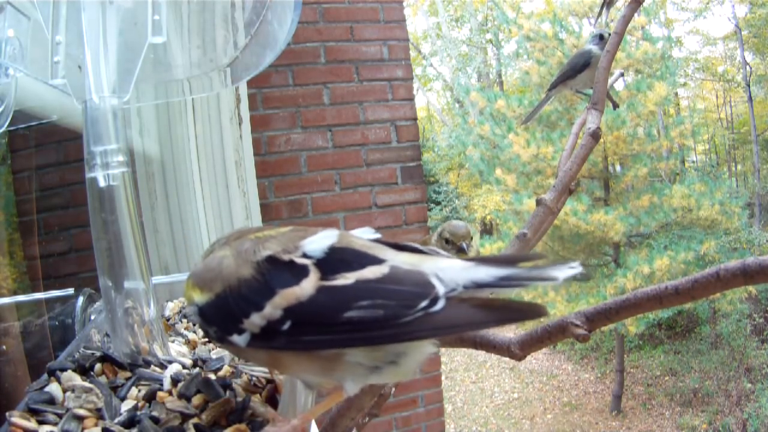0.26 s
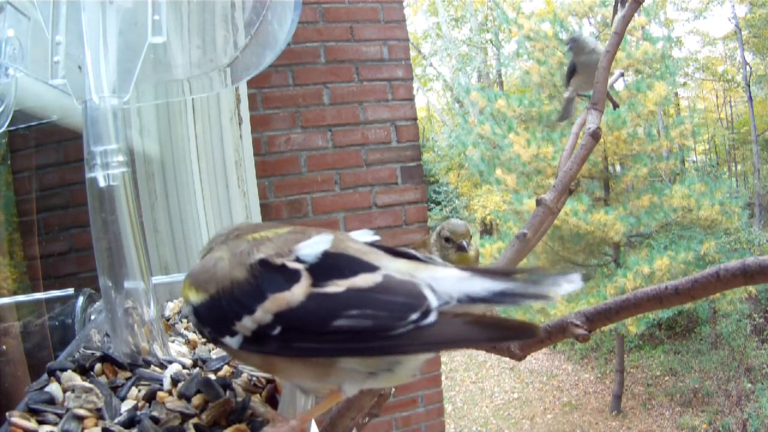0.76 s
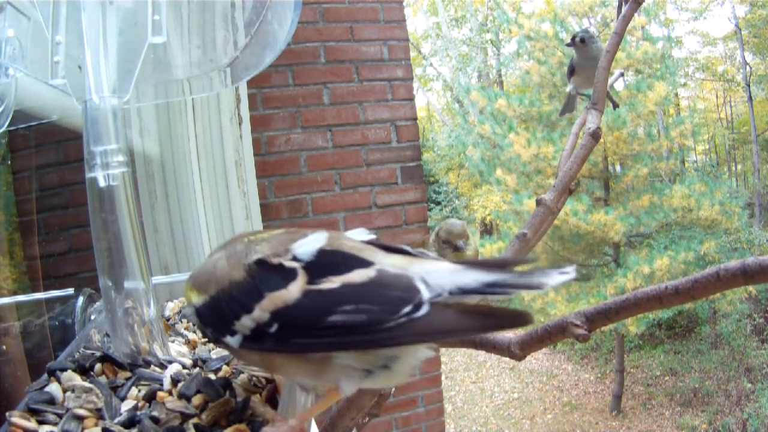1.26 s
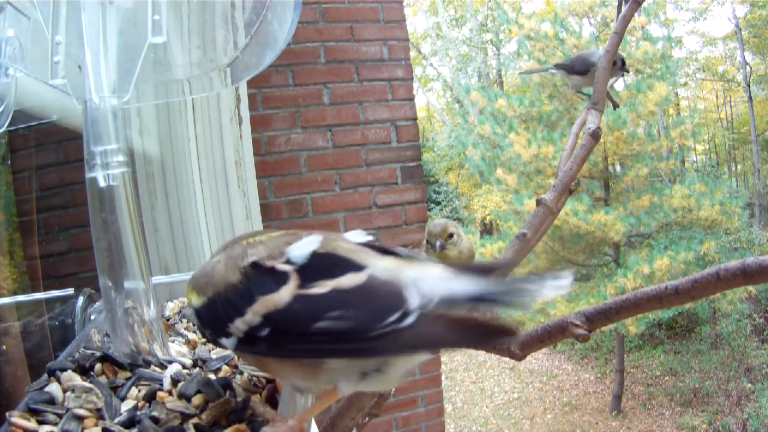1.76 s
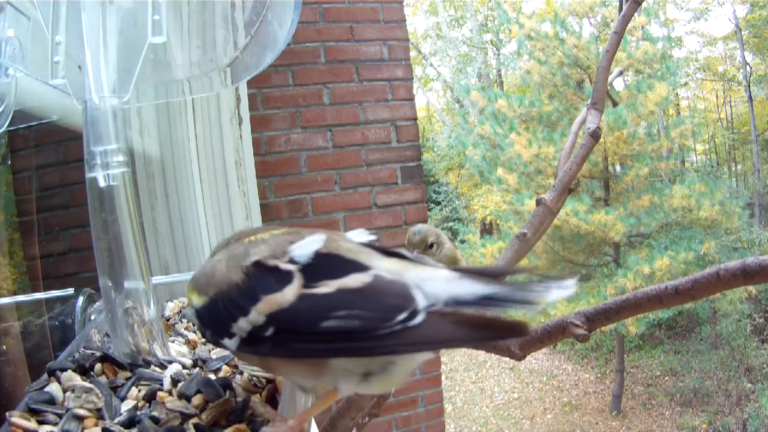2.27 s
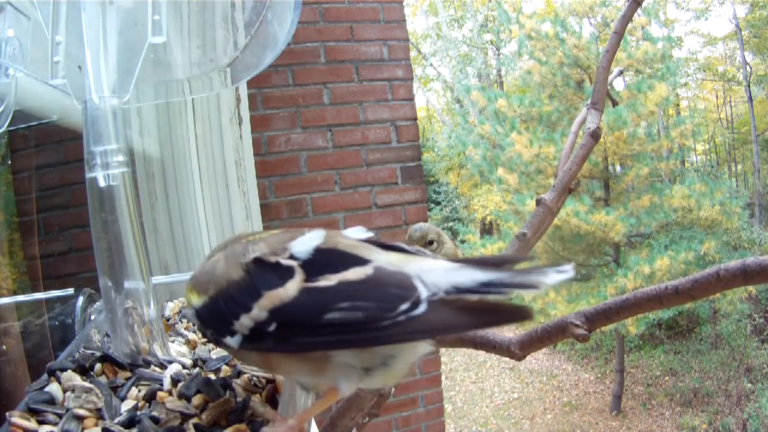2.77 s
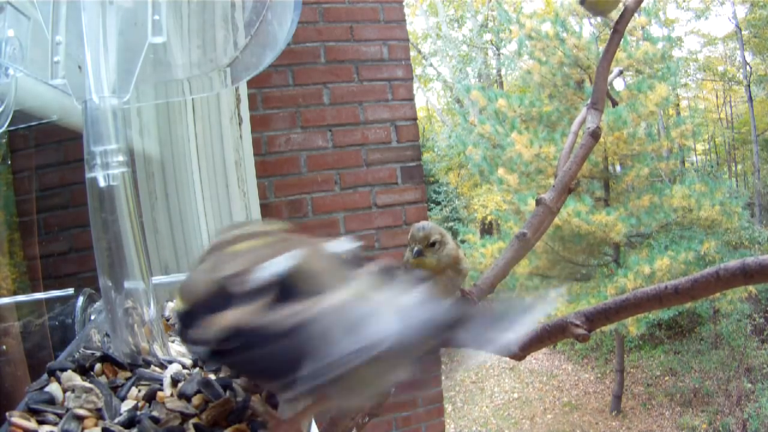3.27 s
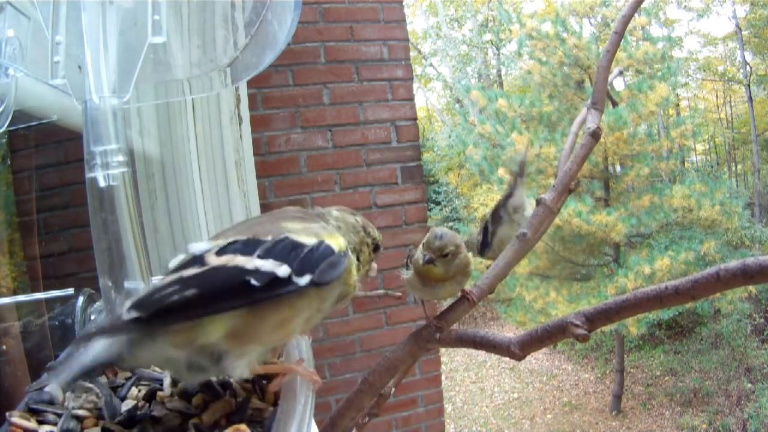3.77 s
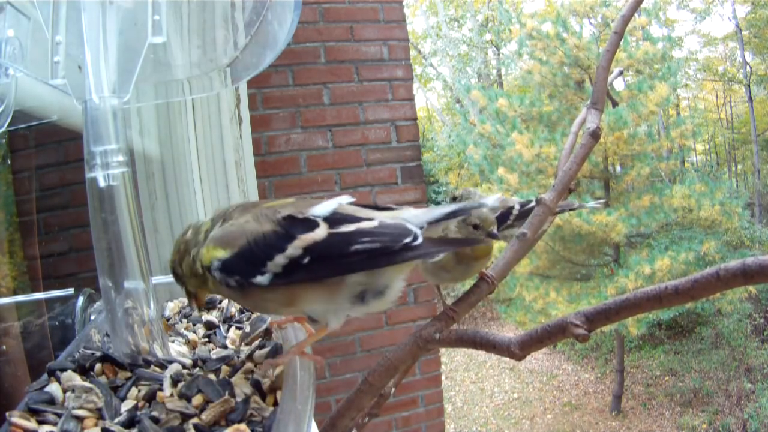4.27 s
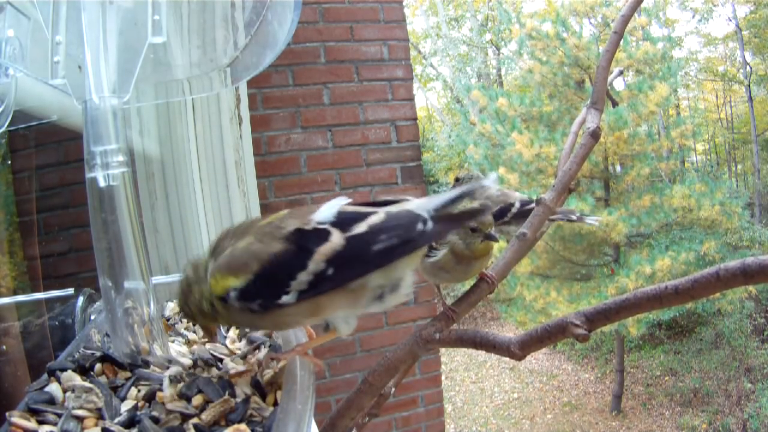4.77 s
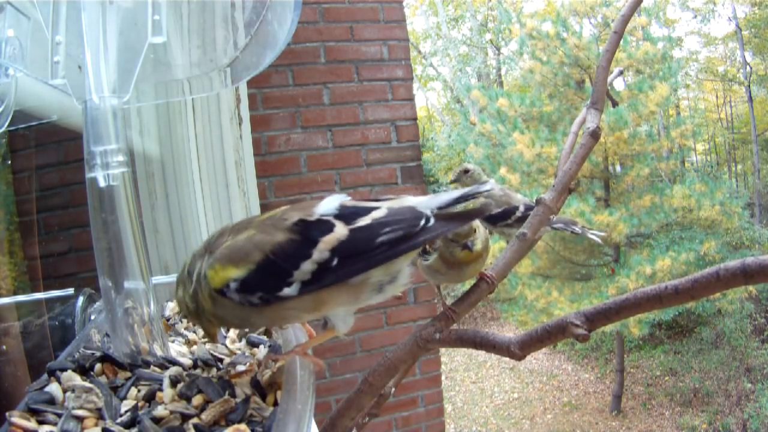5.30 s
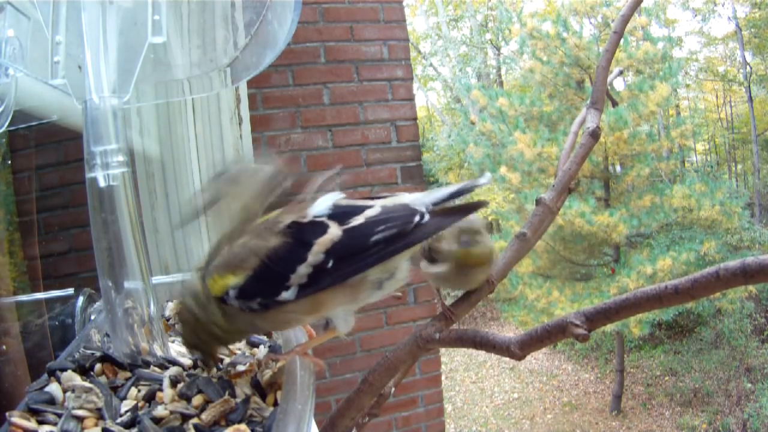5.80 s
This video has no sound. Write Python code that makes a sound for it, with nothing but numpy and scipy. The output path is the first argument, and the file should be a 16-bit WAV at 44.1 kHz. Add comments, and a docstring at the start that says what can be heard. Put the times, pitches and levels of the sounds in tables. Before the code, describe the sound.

Beside a plastic window feeder, a microphone hears constant low outdoor hiss. A quiet tick, then short thin chirps and a low wing whirr as a bird passes. Midway a flurry of seed ticks, foot shuffles and two loud, dry knocks on the tray, with another chirp. Afterwards only sparse ticks and light taps, ending with a close wing gust.

```python
"""Steady outdoor hiss, then beaks ticking on seeds: finches feed in a plastic window feeder beside a small camera.
Ticks and foot shuffles are decaying tuned noise; the few short chirps are sliding sines.
Wings push gust pulses at the microphone and leave a low noise whirr; knocks on the tray, two of them loud,
are pulses with ringing modes and a rattle. The camera samples slowly, mirroring each sound into the treble."""
import sys
import numpy as np
from scipy import signal
from scipy.fft import rfft, irfft
from scipy.io import wavfile
from scipy.ndimage import uniform_filter1d

SR = 44100
rng = np.random.default_rng(int(sys.argv[2]) if len(sys.argv) > 2 else 0)


def inscribe(sig):
    """Save sig as 16-bit PCM at rate SR to the path in sys.argv[1].

    A 1-D sig is mono; a 2-D sig holds one channel per row.
    Samples are clipped to [-1, 1] before scaling.
    """
    pcm = np.round(np.clip(np.atleast_2d(sig).T, -1, 1) * 32767)
    wavfile.write(sys.argv[1], SR, pcm.astype(np.int16))


N = 266496
TIME, FREQS = np.arange(N) / SR, np.fft.rfftfreq(N, 1 / SR)


def amp(db):
    """Decibels to gain."""
    return 10 ** (np.asarray(db) / 20)


def unit(x):
    """Scales to rms 1."""
    return x / np.sqrt(np.mean(x ** 2) + 1e-20)


def add(mix, start_s, sound):
    """Mixes a sound in at start_s, in place."""
    part = mix[max(round(start_s * SR), 0):][:len(sound)]
    part += sound[:len(part)]


def colour(x, points):
    """Filters by (f/Hz, gain/dB) points, interpolated over log frequency."""
    hz, db = np.transpose(points)
    gain_db = np.interp(np.log(FREQS + 1), np.log(hz + 1), db)
    return irfft(rfft(x) * amp(gain_db), N)


def noise(spectrum):
    """Steady noise of one colour, rms 1."""
    return unit(colour(rng.standard_normal(N), spectrum))


def butter2(x, cutoff_hz, kind="low"):
    """Second-order Butterworth filter."""
    return signal.sosfilt(signal.butter(2, cutoff_hz, kind, fs=SR, output="sos"), x)


# Outdoor rumble and microphone hiss, relative density: (f/Hz, level/dB)
HISS_SPECTRUM = [(15, -19), (35, -6.5), (68, 1), (100, -2.5), (135, -2), (250, -5), (340, -8.5),
                 (500, -11.5), (1000, -14), (1450, -19), (2500, -18.5), (3500, -20), (5000, -21.5)]
HISS_DB = -47
# Tree rustle as a breeze gets up, before BREEZE_GAIN_DB: (t/s, level/dB)
BREEZE_LEVEL = [(0, -60), (1.5, -49), (2.3, -48.5), (3.4, -44.5), (5.2, -46.5), (6.04, -46.5)]
# Tree rustle, relative density: (f/Hz, level/dB)
BREEZE_SPECTRUM = [(100, -32), (400, 5.5), (700, 2.5), (1100, -2), (1700, -8), (5000, -11)]
BREEZE_GAIN_DB = -7


def outdoor_air():
    """Constant coloured noise, plus leaf-rustle noise whose level follows the breeze."""
    hiss = amp(HISS_DB) * noise(HISS_SPECTRUM)
    breeze_db = BREEZE_GAIN_DB + np.interp(TIME, *np.transpose(BREEZE_LEVEL))
    return hiss + amp(breeze_db) * noise(BREEZE_SPECTRUM)


# Beaks and claws on seed husks: (t/s, level/dB, centre f/Hz, ring t60/s)
TICKS = [(0.0166, -39, 4380, 0.014), (2.369, -36.5, 3950, 0.0069), (3.3816, -34, 5200, .006),
         (3.3907, -29.5, 6200, .008), (3.394, -35, 6240, 0.0082), (3.416, -41, 3250, .02),
         (3.4334, -31, 4200, .0041), (3.6692, -32.5, 2600, 0.01), (3.6825, -44, 2700, 0.025),
         (3.6875, -37, 2700, 0.018), (3.7, -43, 4000, 0.0046), (3.7058, -36, 2600, 0.015),
         (3.809, -41, 3170, .008), (3.8228, -31, 3300, 0.0039), (3.844, -45, 3800, .011),
         (4.185, -44.5, 4800, .012), (4.701, -39, 4730, .016), (4.732, -32.5, 5900, 0.0069),
         (5.0003, -31.5, 3200, 0.012), (5.796, -40, 5900, .01), (5.81, -44, 4200, .013)]


def seeds(half_width_hz=1250, scatter_db=-19, scatter_t60_s=0.075):
    """A husk snaps in a brief, broadly tuned burst, and the seeds around it shift."""
    out, t = np.zeros(N), TIME[:SR // 12]
    f = np.fft.rfftfreq(len(t), 1 / SR)
    for start_s, db, centre_hz, t60_s in TICKS + shuffles():
        resonance = 1 / (1 + 1j * (f ** 2 - centre_hz ** 2) / (2 * half_width_hz * f + 1))
        grit = unit(irfft(rfft(rng.standard_normal(len(t))) * resonance, len(t)))
        snap = amp(-60 * t / t60_s)
        scatter = amp(scatter_db - 60 * t / scatter_t60_s)
        fall = snap + scatter
        add(out, start_s, amp(db) * unit(grit * fall) * np.sqrt(np.mean(fall ** 2)))
    return out


# Whistled notes; the overlapping two are the two sides of one syrinx:
# (t/s, length/s, first f/Hz, last f/Hz, bend: 1 = straight, more = late fall,
#  peak level/dB, peak place/0-1, swell/dB)
CHIRPS = [(1.749, .021, 2880, 2630, 1.2, -47, 0.58, 9), (2.4775, 0.028, 3350, 2820, 0.97, -36, 0.46, 4),
          (2.627, .049, 4230, 3060, 1.65, -35, 0.62, 13), (2.632, 0.043, 3160, 2210, 0.72, -40, 0.64, 11),
          (3.9725, 0.043, 3160, 2780, 3.3, -38.5, 0.5, 9)]
SWELL_WIDTH = 0.26  # share of a note


def chirp(start_s, length_s, first_hz, last_hz, bend, db, peak, swell_db, waver=0.0039, flutter_db=1.8):
    """A nearly pure whistle swells once as it slides down; pitch and strength tremble a little."""
    t = np.arange(0, length_s, 1 / SR)
    u = t / length_s
    # Noise smoothed over 90 samples
    tremble, flutter = (unit(uniform_filter1d(rng.standard_normal(N), size=90))[:len(t)] for _ in range(2))
    slide_hz = first_hz + (last_hz - first_hz) * u ** bend
    turns = np.cumsum(slide_hz * (1 + waver * tremble)) / SR
    swell = np.exp(-((u - peak) / SWELL_WIDTH) ** 2) - 1
    level = amp(db + swell_db * swell + flutter_db * flutter)
    level = level * signal.windows.tukey(len(t), 0.05)
    return start_s, np.sqrt(2) * level * np.sin(2 * np.pi * turns)


def chirps():
    """Places every whistled note."""
    out = np.zeros(N)
    for row in CHIRPS:
        add(out, *chirp(*row))
    return out


# Birds flying close to the microphone:
# (t/s, close pass/s, peak gust level/dB, eddy share, whirr level at t/dB, whirr length/s)
FLIGHTS = [(2.21, 0.155, -34, .27, -47.5, .68), (5.636, .02, -34, 0.24, -58.5, .2),
           (5.757, .02, -41, 0.28, -58.5, .1), (6.023, .02, -20, 0.18, -38.5, .1)]
# Wing whirr, relative density: (f/Hz, level/dB)
WHIRR_SPECTRUM = [(20, -5), (95, -33), (117, 4.5), (138, 0), (160, 1), (200, -16), (240, -7), (310, -20),
                  (1000, -19), (5000, -39)]
WINGBEAT_S, UPSTROKE_S = 0.0535, 0.0376  # beat period; downstroke-to-upstroke delay
GUST_HALF_S, PASS_FADE_DB = 0.0048, -5.5  # gust half length; loss at either end of a pass
WHIRR_ATTACK_S, WHIRR_SAG_DB_PER_S, WHIRR_RELEASE_S = 0.031, -7.5, 0.43


def wings(eddy_cutoff_hz=160):
    """Each stroke pushes air at the microphone, then draws it back, shedding eddies; a low whirr lingers."""
    eddies = unit(butter2(rng.standard_normal(N), eddy_cutoff_hz))
    whirr, out = noise(WHIRR_SPECTRUM), np.zeros(N)
    for start_s, pass_s, gust_db, eddy_share, whirr_db, whirr_s in FLIGHTS:
        t = TIME - start_s
        attack = np.clip(1 + t / WHIRR_ATTACK_S, 0, 1)  # full at start_s
        release = np.clip(1 - (t - whirr_s) / WHIRR_RELEASE_S, 0, 1)
        sagging_db = whirr_db + WHIRR_SAG_DB_PER_S * np.maximum(t, 0)
        out += whirr * attack * release * amp(sagging_db)
        downstrokes = np.arange(0, pass_s, WINGBEAT_S)
        upstrokes = np.arange(UPSTROKE_S, pass_s, WINGBEAT_S)
        for stroke_s in np.r_[downstrokes, upstrokes]:
            u = (t - stroke_s) / GUST_HALF_S
            db = gust_db + PASS_FADE_DB * (2 * stroke_s / pass_s - 1) ** 2
            out += amp(db) * (eddy_share * eddies - u) * np.exp((1 - u ** 2) / 2)
    return out


# Feet shuffling in the seeds: (t/s, length/s, mean level/dB, centre f/Hz)
SHUFFLES = [(2.373, .022, -44, 4400), (3.354, .01, -46, 3500), (3.397, .06, -47, 3800),
            (3.541, .01, -44, 3500), (3.658, .05, -46, 2800), (3.731, .02, -50, 3600),
            (4.738, .02, -49, 4400), (6.012, .025, -47, 3400)]
SHUFFLE_GAP_S, SHUFFLE_SPREAD_DB, SHUFFLE_T60_S = 0.011, 3.5, 0.017


def shuffles():
    """Shuffling feet make runs of ticks for seeds(): one per gap, at a chance moment and strength."""
    ticks = []
    for start_s, length_s, db, centre_hz in SHUFFLES:
        slots_s = np.arange(start_s, start_s + length_s, SHUFFLE_GAP_S)
        for slot_s, (late, force) in zip(slots_s, rng.random(size=(40, 2))):
            tick_db = db + SHUFFLE_SPREAD_DB * (2 * force - 1)
            ticks.append((slot_s + SHUFFLE_GAP_S * late, tick_db, centre_hz, SHUFFLE_T60_S))
    return ticks


# Blows on the tray: (t/s, pulse level/dB, contact time/s, ring re pulse/dB, pitch factor of the spot hit)
KNOCKS = [(3.3812, -38, .00015, 8, 0.85), (3.4168, -29, 0.00011, -4, 0.92),
          (3.4358, -16, 0.00012, 3.5, 1.154), (3.6684, -28, 0.00012, -18, 0.93),
          (3.8274, -11, 0.00013, 4.5, 1.07), (3.999, -30, 0.000097, 2.5, 0.89),
          (4.7325, -35, 0.00013, -4, 0.82), (5.0008, -34, 0.00012, 2, 0.95),
          (6.016, -32.5, 0.00061, 10.5, 1.03)]
# Tray modes before the pitch factor: (f/Hz, relative level/dB, t60/s)
TRAY_MODES = [(705, -14.5, 0.011), (1013, -4.5, 0.0088), (1205, -25, 0.014), (1820, -7, 0.004),
              (2500, -26, 0.0056), (3270, -22, 0.013), (4200, -23, 0.018), (4800, -45, 0.0095)]


def tray(rattle_db=-32, rattle_t60_s=0.076, rattle_cutoff_hz=3600, spread_s=0.00034, bass_cut_hz=280):
    """The jolted wall sends out one pulse, rings and rattles its seeds; a longer contact is duller."""
    out, t = np.zeros(N), TIME[:SR // 12]
    for hit_s, db, contact_s, ring_db, pitch in KNOCKS:
        u = (TIME - hit_s) / contact_s
        out += amp(db) * (u ** 2 - 1) * np.exp(-u ** 2 / 2)
        ring = np.zeros(len(t))
        for mode_hz, mode_db, t60_s in TRAY_MODES:
            ring += amp(mode_db - 60 * t / t60_s) * np.sin(2 * np.pi * mode_hz * pitch * t)
        ring *= 1 - np.exp(-t / spread_s)  # the bending wave takes a moment to spread
        grit = unit(butter2(rng.standard_normal(len(t)), rattle_cutoff_hz))
        rattle = grit * amp(rattle_db - 60 * t / rattle_t60_s)
        body = butter2(ring + rattle, bass_cut_hz, "high")  # a small wall radiates little bass
        add(out, hit_s + np.sqrt(3) * contact_s, amp(db + ring_db) * body)
    return out


def scene():
    """Birds and feeder, close and dry, over the outdoor air."""
    return (outdoor_air() + seeds() + chirps() + wings() + tray())[None]


# Camera response ahead of the sampler: (f/Hz, gain/dB)
INPUT_RESPONSE = [(20, 3), (5050, -0.5), (5500, -5), (6000, -16), (6500, -32), (7500, -78)]
# Camera output colour: (f/Hz, gain/dB)
OUTPUT_RESPONSE = [(20, -1), (9000, 0), (11000, 0.5), (14000, 1)]
SAMPLER_HZ, EDGE_HZ = 12000, 15400  # sampling rate; band limit


def record(dry):
    """Slow sample-and-hold mirrors sounds about its sampling rate; output colour and band limit follow."""
    band = colour(dry[0], INPUT_RESPONSE)
    mirrored = band * (1 + 2 * np.cos(2 * np.pi * SAMPLER_HZ * TIME))
    held = irfft(rfft(mirrored) * np.sinc(FREQS / SAMPLER_HZ), N)  # loss from holding each sample
    edge = signal.firwin(511, EDGE_HZ, window=("kaiser", 9), fs=SR)
    return signal.oaconvolve(colour(held, OUTPUT_RESPONSE), edge, "same")[None]


dry = scene()
out = record(dry)
inscribe(out)
```